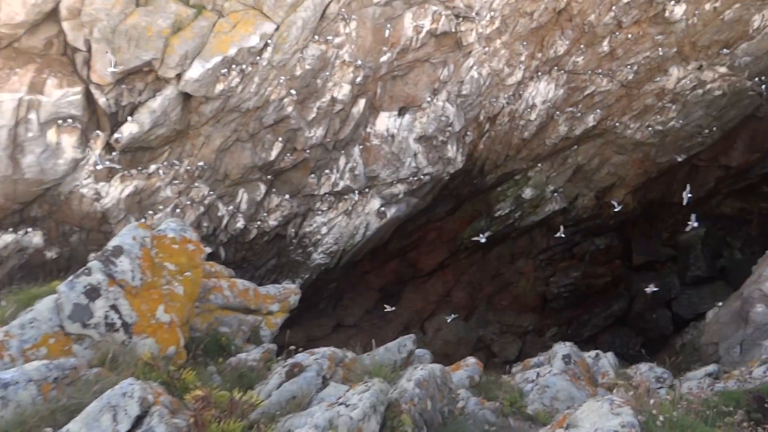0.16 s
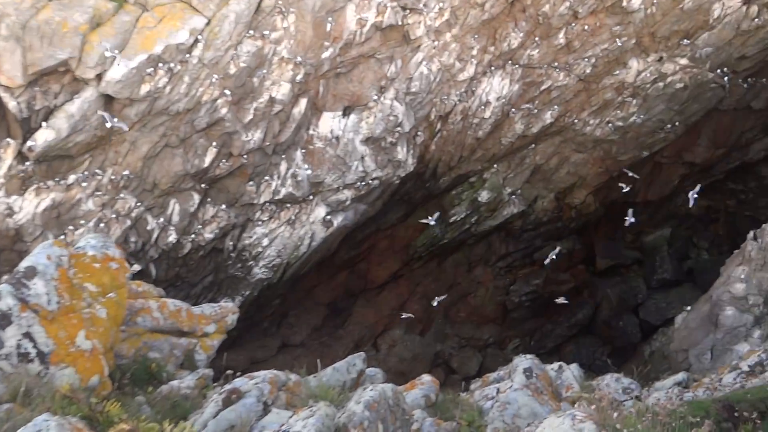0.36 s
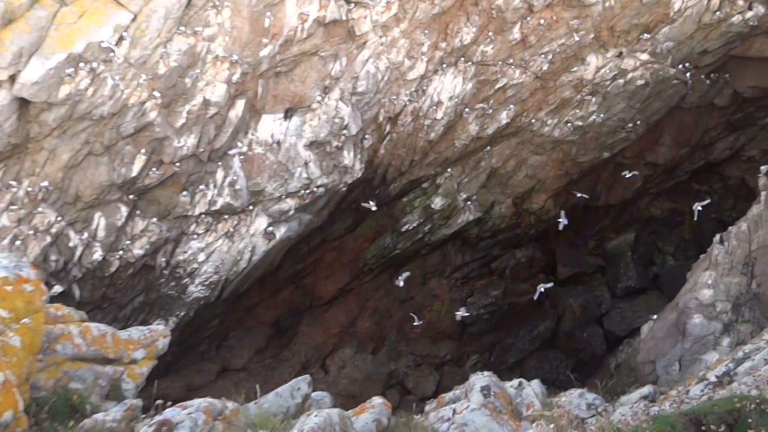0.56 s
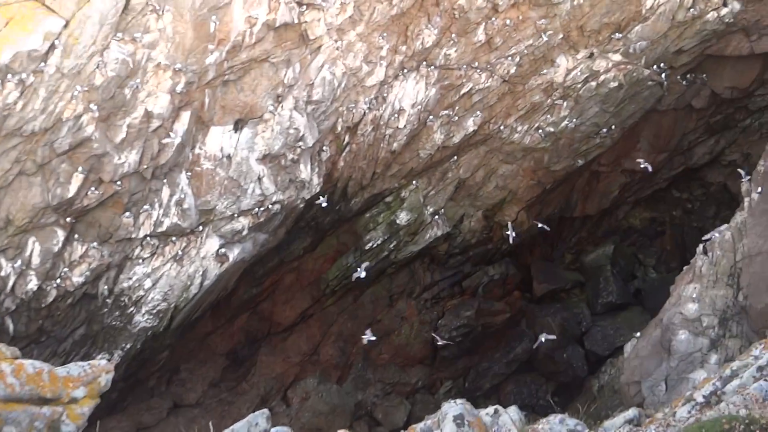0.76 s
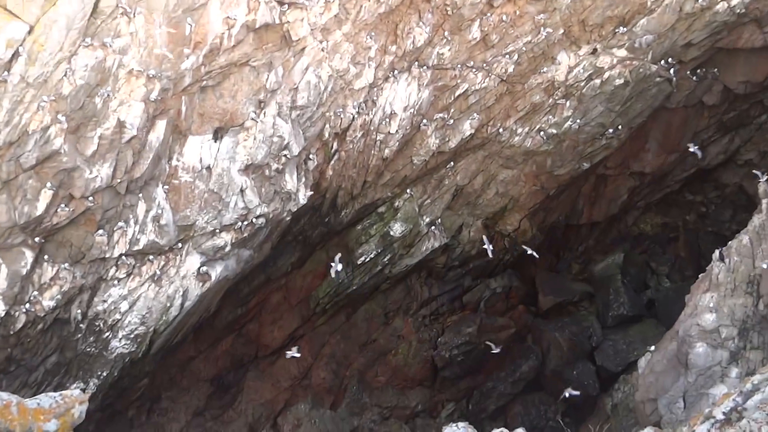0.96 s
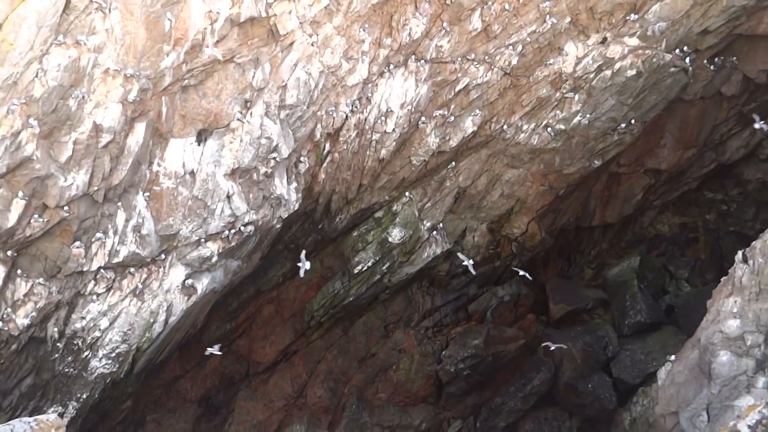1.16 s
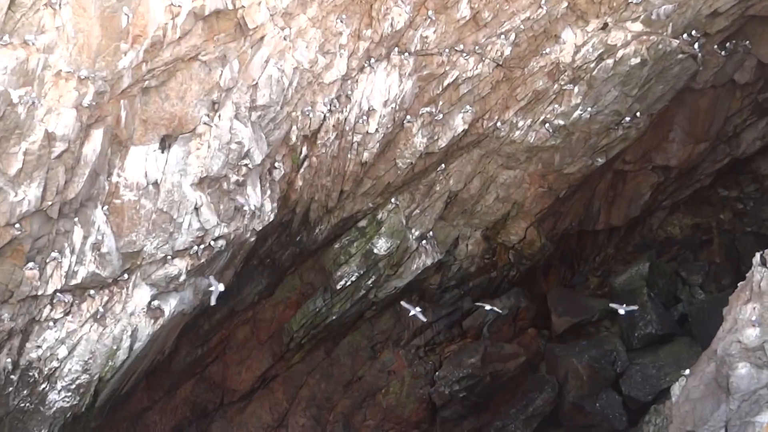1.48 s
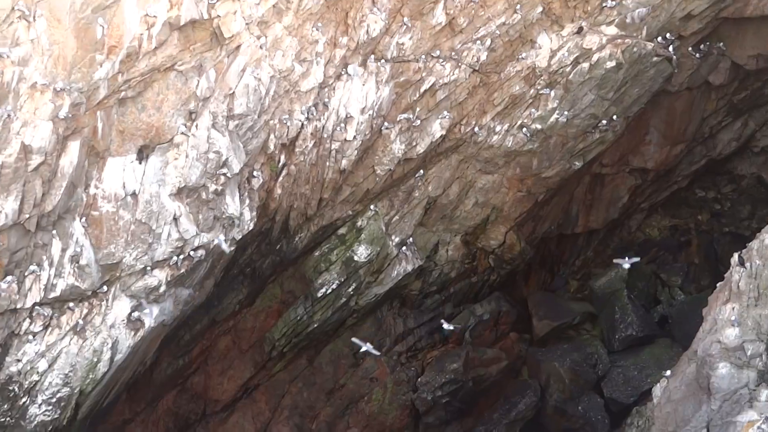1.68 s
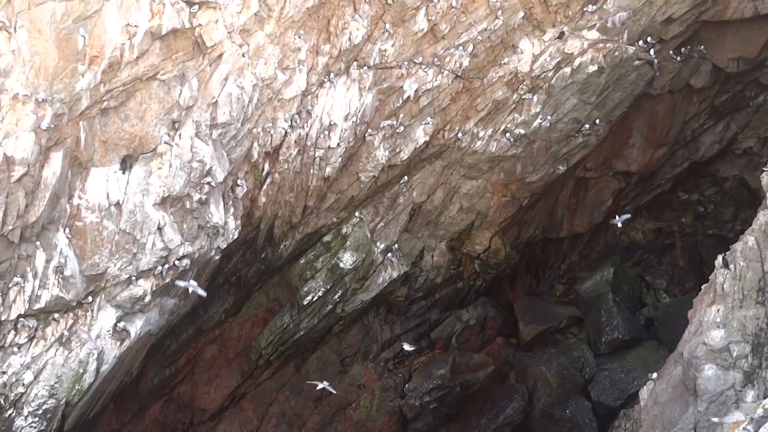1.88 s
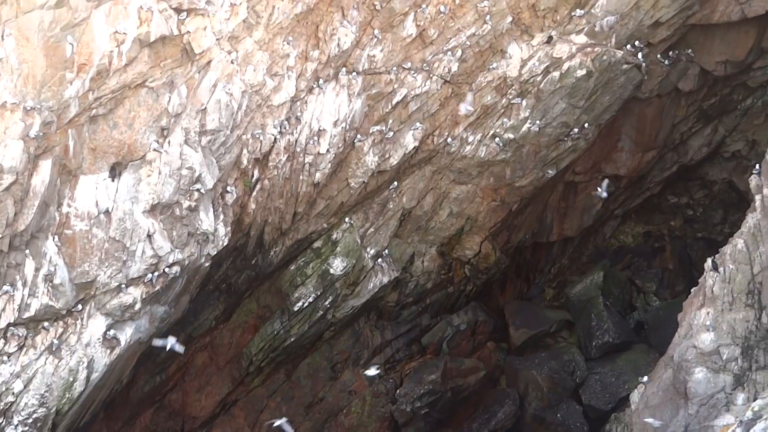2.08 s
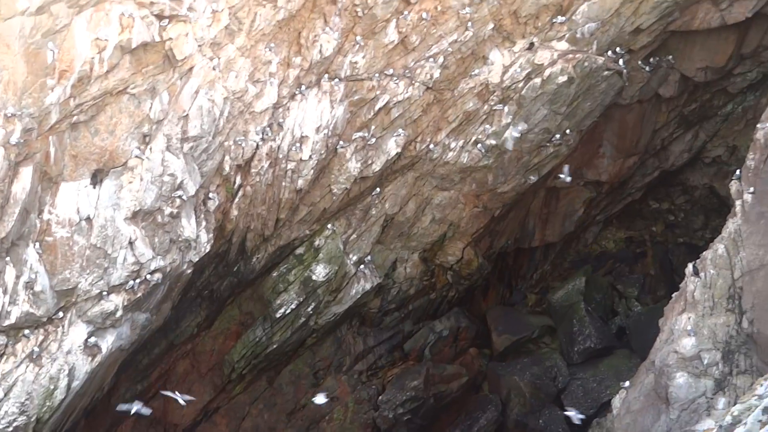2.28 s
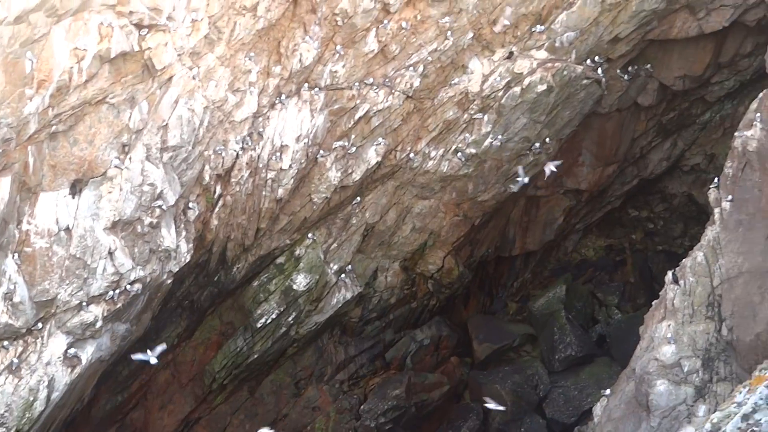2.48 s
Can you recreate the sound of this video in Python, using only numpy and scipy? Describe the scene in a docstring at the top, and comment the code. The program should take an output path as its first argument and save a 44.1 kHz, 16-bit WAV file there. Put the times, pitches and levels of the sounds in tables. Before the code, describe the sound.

Overlapping seabird cries, loud and close at first, thin slightly mid-way then surge again near the end, with brief throaty growls, rock echo, an even wash of surf and very faint wind thumps.

```python
"""A colony of gulls on a sea cliff: birds close by wail and squeal, each call a stack of harmonics.
Behind them a far crowd of callers blurs, made of many short calls, their echo off the rock and shaped noise.
Surf, a steady wash of noise, lies below; now and then a near bird growls, in slow pulses ringing a throat.
Later two soft thumps of wind, low sine puffs, touch the microphone."""
import sys
import numpy as np
from scipy import signal
from scipy.io import wavfile
from scipy.ndimage import uniform_filter1d

SR = 44100
rng = np.random.default_rng(int(sys.argv[2]) if len(sys.argv) > 2 else 0)


def wav_record(signal):
    """Record a signal, one row per channel, as 16-bit PCM in the file named by sys.argv[1]."""
    frames = np.transpose(np.atleast_2d(signal))
    bounded = np.clip(frames, -1, 1)
    # unit amplitude maps onto the largest positive 16-bit level
    quanta = np.round(bounded * 32767).astype(np.int16)
    wavfile.write(sys.argv[1], SR, quanta)


N = 115983
ATTACK_S, RELEASE_S = 0.0045, 0.007  # onset and fade settings of every call and growl


def gain_of(db):
    """Amplitude factor of a level in dB."""
    return 10 ** (np.asarray(db) / 20)


def evened(x):
    """Scales a signal to rms 1."""
    return x / np.sqrt(np.mean(x ** 2) + 1e-20)


def read(points, hz):
    """Reads a curve of (f/Hz, value) points, interpolated along log frequency."""
    f, value = np.transpose(points)
    return np.interp(np.log(hz + 1), np.log(f + 1), value)


def add(mix, start_s, sound, pan_db):
    """Places a sound in the stereo mix by a left-right level difference."""
    part = mix[:, max(round(start_s * SR), 0):][:, :len(sound)]
    sides = gain_of([[pan_db / 2], [-pan_db / 2]])
    part += sides * sound[:part.shape[1]]


def drift(count, size):
    """Smooth random wandering of rms 1: noise averaged twice over size steps."""
    once = uniform_filter1d(rng.standard_normal(count), size)
    return evened(uniform_filter1d(once, size))


def swell(t, length):
    """Loudness outline of a call: attack, hold, release, with rounded slopes."""
    rise = t / ATTACK_S
    fall = (length + RELEASE_S - t) / (2 * RELEASE_S)
    return np.sin(np.pi / 2 * np.clip(np.minimum(rise, fall), 0, 1)) ** 2


def shaped(x, field_db):
    """Weights the short-time spectrum by a level rule of frequency and time."""
    hz, t, z = signal.stft(x, SR, nperseg=512)
    weighted = z * gain_of(field_db(hz[:, None], t))
    return signal.istft(weighted, SR, nperseg=512)[1][:, :x.shape[1]]


def voice(length, pitch_hz, effort_db, harmonics_db, rasp_db):
    """One call: a stack of harmonics on a slightly unsteady pitch, each fringed with rasp."""
    wobble, shimmer_db = 0.0022, 0.65  # rms unsteadiness of pitch (fraction) and of level
    throat_hold = 0.9  # 0: each harmonic keeps its level as pitch glides; 1: a fixed throat colours them
    rasp_full_hz = 4000  # harmonics below this are less hoarse
    t = np.arange(0, length + RELEASE_S, 1 / SR)
    n = len(t)
    steps = np.linspace(0, length, len(pitch_hz))

    glide = uniform_filter1d(np.interp(t, steps, pitch_hz), size=400, mode="nearest")
    hz = glide * (1 + wobble * drift(n, size=250))
    turn = 2 * np.pi * np.cumsum(hz) / SR

    k = np.arange(1, len(harmonics_db) + 1)[:, None]  # harmonic numbers
    throat_place = k * (hz / np.median(hz)) ** throat_hold
    colour = gain_of(np.interp(throat_place, k[:, 0], harmonics_db))
    rasp_depth = gain_of(rasp_db) * np.minimum(k * hz / rasp_full_hz, 1) ** .5
    rasp = 1 + rasp_depth * [drift(n, size=40) for _ in k]
    audible = k * hz < SR / 2
    stack = (colour * rasp * np.cos(k * turn + k ** 2) * audible).sum(axis=0)

    flutter = gain_of(shimmer_db * drift(n, size=300))
    effort = gain_of(np.interp(t, steps, effort_db))
    return np.sqrt(2) * stack * flutter * effort * swell(t, length)


def near_calls():
    """Birds close by: each call glides through four even steps of pitch and effort."""
    # near calls: t/s, length/s, left-right/dB, four of pitch f/Hz, four of effort level/dB
    calls = [(0, 0.062, -0.6, 1017, 1010, 1038, 1027, -37, -43.5, -40, -43),
             (0.029, 0.086, 3.5, 1213, 1234, 1276, 1300, -34, -50, -40, -54),
             (0.05, 0.038, -1.6, 1108, 1162, 1165, 1233, -25.5, -30.5, -27.5, -25.5),
             (0.093, 0.029, 0.9, 570, 615, 649, 648, -27, -26.5, -26, -25),
             (0.14, 0.064, 1.5, 597, 626, 612, 589, -32, -39.5, -37, -22),
             (0.14, 0.13, -2, 1213, 1200, 1173, 1246, -45, -28.5, -28, -31),
             (0.201, 0.087, 1, 576, 661, 691, 708, -26.5, -19.5, -20, -17),
             (0.279, 0.053, 6.5, 1240, 1242, 1247, 1228, -28, -28, -32.5, -30),
             (0.287, 0.031, -0.5, 799, 784, 777, 797, -21, -23.5, -20.5, -27),
             (0.33, 0.072, 0.4, 611, 609.5, 643, 602, -28, -29.5, -26, -27),
             (0.356, 0.056, -1, 686, 649, 670, 647, -35, -28.5, -35, -42),
             (0.397, 0.06, 1.5, 883, 907, 899.4, 887, -23, -23.5, -21.5, -24.5),
             (0.401, 0.15, 1.4, 594, 579, 587, 605, -28, -34.5, -29.5, -29),
             (0.398, 0.17, 1, 1810, 1792, 1770, 1709, -21.5, -21.5, -21, -24.5),
             (0.53, 0.13, 1.5, 605.7, 611, 641.5, 615, -26.5, -28, -24.5, -32),
             (0.572, 0.076, 1, 1766, 1790, 1807, 1756, -53, -33, -33.5, -39),
             (0.659, 0.077, 3, 1750, 1750, 1725, 1660, -31, -30.5, -33.5, -26.5),
             (0.76, 0.14, 1.5, 1757, 1762, 1747, 1756, -45, -30, -39, -48),
             (0.925, 0.039, 3, 553, 575, 586, 586, -36, -36, -40, -40),
             (0.953, 0.033, 3, 407, 430, 462, 493, -43, -36, -40, -37),
             (0.961, 0.12, 4.5, 635, 640, 642, 647, -46, -43, -38.5, -43),
             (1.052, 0.061, 4, 689, 679, 703, 688, -33, -37.5, -34, -34),
             (1.078, 0.078, 2.5, 558.4, 594, 631, 631, -32, -36, -32.5, -34),
             (1.105, 0.045, -4, 975, 1000, 1005, 980, -45, -40, -41, -43),
             (1.152, 0.055, 4, 538, 565, 596, 618, -39, -33.5, -39, -33),
             (1.165, 0.16, 2.5, 1299, 1245, 1235, 1257, -35, -32.5, -33.5, -27.5),
             (1.207, 0.13, 3, 616, 628, 618, 627, -36, -30.5, -31, -31),
             (1.231, 0.077, -1, 564, 572, 592, 593, -37, -38, -37, -34),
             (1.317, 0.082, 1.0, 1728, 1774, 1770, 1760, -36, -28, -28.5, -32),
             (1.331, 0.15, 2.5, 633, 625, 650.6, 650, -36, -37, -37, -40),
             (1.418, 0.091, 3.5, 558, 557, 559, 526, -34, -34, -30.5, -30),
             (1.486, 0.15, 2.5, 1756, 1784, 1816, 1755, -32, -37, -37.5, -37),
             (1.551, 0.11, 4, 1819, 1836, 1796, 1767, -45, -37.5, -33.5, -34),
             (1.682, 0.12, 3, 1874, 1781, 1810, 1821, -31, -35.5, -36, -38),
             (1.706, 0.05, 5, 1410, 1484, 1606, 1720, -46, -29, -38, -51),
             (1.737, 0.044, 3, 578, 588, 600, 620, -29, -33, -53, -42),
             (1.923, 0.053, 2.5, 638, 648, 660, 728, -39, -31, -32.5, -31),
             (1.967, 0.073, 7, 1174, 1150, 1097, 1120, -47, -42, -46, -41),
             (1.981, 0.066, 3.5, 644, 631, 629, 653, -40, -40, -38, -35),
             (2.03, 0.1, 3, 553, 545, 527, 523, -32.5, -36, -35, -48),
             (2.044, 0.048, 2.9, 993, 990, 985, 960, -31, -28.5, -27, -26),
             (2.089, 0.18, 7, 610, 590.5, 585.3, 587, -35, -34, -36, -40),
             (2.095, 0.044, 0.5, 680, 687, 685, 660, -21.5, -25.5, -27, -21),
             (2.14, 0.066, 0, 656, 655, 643, 661, -29, -24, -33, -29),
             (2.162, 0.11, 1, 651, 635, 633, 629, -38, -23, -28.5, -37),
             (2.242, 0.13, 6, 582.4, 580, 572, 560, -43, -37, -37, -38),
             (2.249, 0.081, 1.3, 626, 620.4, 617, 610, -30, -39, -33.5, -35),
             (2.314, 0.062, 0.5, 803, 790, 805, 790, -34.5, -29.5, -30, -27.5),
             (2.372, 0.12, 2, 772, 688, 714.5, 725.6, -35.5, -27, -28, -29),
             (2.5, 0.062, 2.5, 826, 814, 797, 780, -31.5, -31, -38, -29),
             (2.5, 0.11, 5, 522, 535, 533.5, 537, -35, -38, -44, -34),
             (2.592, 0.037, 4, 561, 620, 632, 666, -31, -27, -28, -22.5)]
    # throat colour, one row a call: level/dB of harmonics 1, 2, 3 ..
    harmonics = [(-9, 3.5, -2, -28, -28, -16, -33, -33, -32.5, -45, -44, -45),
                 (-7, 2, 2.5, -12, -24, -32, -31.5, -45, -36, -45),
                 (-11.5, -0.5, -28.5, -17, -25, -34, -36.5, -42, -45, -45, -45),
                 (-30, -13, -9.5, 2, -26, -19, -22, -22, -19, -19),
                 (-27, -6.5, -27, -13, -7, -21, -11, -32, -7, -15, -21, -13),
                 (-9.5, -4, -29.5, -21, -12, -30, -18, -38, -38, -31),
                 (-19.5, -14.5, -9.5, -16, -17.5, -21, -21, -4, -2.5, -23.5, -19, -20.5),
                 (-34, -23, 3.5, -22, -11, -27, -30.5, -45, -25, -29),
                 (-19, -15, -6.5, -9.5, -19, -8, -6, -6, -11, -39, -23, -23),
                 (-27, -13, -2, -16, -11, -16, -14, -12, -6, -10, -21, -31),
                 (-12, -8, -3, -6, -26, -15, -21, -21, -14, -15, -31, -25.5),
                 (-19, -29, -23, -26, -10, -8, -7.5, -21.5, -15.5, -32, -48, -49),
                 (-12, -5, -19, -9, -23, -26, -28, -8, -26, -26, -16, -23),
                 (-2.5, -22, -26, -25, -19, -40, -42),
                 (-15, -4, -20, -5, -19, -9, -40, -19.5, -28, -20, -17, -31),
                 (0, -27, -10, -24, -15, -45, -45), (-5.5, 2.5, -12.5, -9.5, -20, -48, -31),
                 (-22, -2, -12, -10.5, -27, -45, -49),
                 (-26, -15, -8, -4.5, -12, -3, -27, -17, -10, -6.5, -9, -27),
                 (-25, -11, -21, -14, -3, 2, -16, -20, -25, -10, -10, -20),
                 (-24, -8, -24, -5, -26, -1.5, -14, -3.5, -8, -31, -28, -35),
                 (-25, -11, -12, -1, -14, -16, -10, -17),
                 (-29, -15, -14, 1, -15, -27.5, -19, -4.5, -22, -16, -18, -31),
                 (-23, -15, -19, -22, -21, -1, -4, -24),
                 (-12, -7, -26, -12, -7, -13, -5, -11, -18, -4, -23, -18),
                 (-4, -15, -12, -13, -17, -31, -42, -47, -43, -47),
                 (-15, -17, -19, -12, -10, -17, -13, -4.5, -17, -10, -14, -35.5),
                 (-19, -7, -16, -5, -16, -16, -18, -15, -18, -4), (-3, -15.5, -17, -16, -41, -32, -43.5),
                 (-11.5, -7, -8, -0.5, -3.5, -14, -9, -8, -5, -10, -17, -33),
                 (-24, -35, -3, -27, -28, -10, -8, -10, -19, -13, -12, -21),
                 (-3.5, -4, -6.5, -13, -28, -38, -39), (-5, 0.5, -8, -18, -23, -23, -32),
                 (-5, -6, -11, -16, -19, -27.5, -36), (-15, -3.5, -20, -29, -26, -22, -41, -42),
                 (-6, -15, -5, -28, -25.5, -4, -20, -30, -2, -28, -30, -31),
                 (-13, -8.5, -12, -1, -6, -13, -25, -15, -4.5, -39, -29, -23.5),
                 (-18, -7, -14, 0, -20, -18, -28, -32, -37, -42, -42),
                 (-15, -6, -19, -0.5, -2, -10, -5, -17, -8, -21.5, -23, -31),
                 (-6, -2, -10, -21, -9, -9, -5, -24, -9, -13, -16, -18),
                 (-13, -1.5, -9.5, -14, -14, -10, -18, -19, -24, -40, -39, -45),
                 (-16, -6, -8, -8, -3.5, -5, -10, -6, -21, -11.5, -21.5, -26),
                 (-18.5, -9.5, -8, -6.5, -19, -17, -16, -11, -13, -13.5, -17, -20.5),
                 (-17, -20.5, -13, -6, -15, -16, -21.5, -5.5, -9.5, -14, -14, -19),
                 (-14, -13, -9.5, -10, -10, -20, -19, -25, -13, -14, -20, -29),
                 (-11, -7, -7.5, -22, -21, -22, -5, -7, -17, -7, -16, -27),
                 (-9.5, -9, -7, -14, -5, -22, -21, -26, -25, -22, -26, -27),
                 (-7.5, -11, 0, -4.5, -24, -32.5, -8, -14.5, -26, -20, -20, -30.5),
                 (-9, -10, -2, -1.5, -17, -22, -22, -9.5, -10, -17, -18, -22),
                 (-6.5, -26, -17, -2.5, -24, -7.5, -8, -27, -29, -13.5, -23, -32),
                 (-16, -0.5, -23, -5, -21, -4, -15, -2.5, -21, -29, -24, -28),
                 (-12, -26, -9.5, -5, -8.5, -10, -21, -9, -3, -35, -8.5, -12.5)]
    # hoarseness, one value a call: fast random flutter depth/dB
    hoarseness = [-3, -12, -18, -3, -11, -3, -10.5, -10, -8, -6, -6, -10, -19, -24, -18, -20, -18, -10.5,
                  -14, -14, -20, -6, -17, -20, -17, -19, -20, -14, -19, -4, -7, -9, -8, -10, -18, -12, -10,
                  -14, -10, -5, -5, -6, -12, -9, -16, -12, -10, -22, -31, -1, -7, -10]
    near = np.zeros((2, N))
    for (start, length, pan_db, *shape), colour, rasp_db in zip(calls, harmonics, hoarseness):
        add(near, start, voice(length, shape[:4], shape[4:], colour, rasp_db), pan_db)
    return near


def cliff(x):
    """Echo of the rock: sparse taps of random sign, each band dying at its own speed, mostly shared by both sides."""
    # how long the rock rings: f/Hz, fall by 60 dB t/s
    decay_times = [(500, 0.6), (2000, 0.8), (6000, 0.34), (12000, 0.3)]
    echo_wide = 0.28  # share that differs between the sides
    taps = np.zeros((2, SR))
    # one tap at random in every 20 samples, after a short gap
    at = np.arange(500, SR - 20, 20) + rng.integers(0, 20, (2, (SR - 501) // 20))
    np.put_along_axis(taps, at, rng.choice([-1., 1.], at.shape), 1)

    hz, t, z = signal.stft(taps, SR, nperseg=256)
    decay = gain_of(-60 * t / read(decay_times, hz)[:, None])
    middle, side = signal.istft(z * decay, SR, nperseg=256)[1]
    tail = np.array([middle + echo_wide * side, middle - echo_wide * side])
    return signal.fftconvolve(x, tail / np.linalg.norm(tail[0]), axes=1)[:, :N]


def wash(colour, patch_db, swell_db):
    """Stereo noise of rms 1 from random short-time spectra with drifting patches and a gentle swell."""
    # left-right likeness: f/Hz, likeness/1
    likeness = [(25, .97), (60, 0.93), (180, 1), (550, .95), (1650, 0.89), (4970, 0.72), (9000, 0.9),
                (11500, 0.95), (15000, 1)]
    # lean to the left: f/Hz, left-right level/dB
    side_lean = [(25, -.6), (60, -.2), (180, 0), (550, 1.5), (1650, 1.5), (4970, 2.5), (11500, -0.5),
                 (15000, 0)]
    frames, hz = N // 256 + 5, np.fft.rfftfreq(1024, 1 / SR)
    a, b, c, d, patches = rng.standard_normal((frames, 513, 5)).T
    patches = uniform_filter1d(patches, size=10, axis=0)  # across frequency
    patches = evened(uniform_filter1d(patches, size=12, axis=1))  # across time

    same = np.clip(read(likeness, hz), -1, 1)[:, None]
    left = a + 1j * b
    right = same * left + np.sqrt(1 - same ** 2) * (c + 1j * d)
    z = np.array([left, right])

    z *= gain_of(read(colour, hz)[:, None] + patch_db * patches + swell_db * drift(frames, size=20))
    lean = read(side_lean, hz) / 2
    z *= gain_of([lean, -lean])[:, :, None]
    return evened(signal.istft(z, nperseg=1024, noverlap=768)[1][:, :N])


def crowd():
    """Far birds at random pitch and place, a weaker echo trailing them, over the blur of those too far to tell apart."""
    # rise and fall of the crowd: t/s, level/dB, brightness/(dB per octave above 2 kHz)
    course = [(0.0, -28, -1), (0.12, -30.5, -0.5), (0.37, -26.5, 1), (0.59, -29, 0), (0.738, -32, -0.5),
              (1.05, -36.5, 1), (1.3, -27, -1.5), (1.45, -29, -0.5), (1.59, -30, 1), (1.74, -34, 0.5),
              (1.98, -32, 0), (2.23, -26.5, 1.5), (2.63, -27.5, -0.5)]
    # colour of distant birds: f/Hz, level/dB (density per Hz in the blur)
    distant_colour = [(290, -54), (500, -4), (1230, -1.5), (2050, -2), (2500, 0), (3670, -4.5),
                      (4050, -4.5), (6210, -6.5), (8860, -12.5), (13200, -37.5), (15000, -39)]
    calls, length_s, glide = 80, 0.12, 0.07  # glide: fraction of pitch
    low_hz, high_hz = 558.3, 950
    lines_db, fundamental_db, rasp_db = 4, -9.5, -18  # lines: random spread of harmonic levels
    voices_db, blur_db, far_dry_db = -5, -7.5, 5.5  # far_dry: unechoed calls before the echo is added

    far, k = np.zeros((2, N)), np.arange(1, 15)
    for bird, (at, high, bend, end, long, side) in enumerate(rng.random((calls, 6))):
        hz = low_hz * (high_hz / low_hz) ** (high ** 1.4)  # low pitches are commoner
        colour = read(distant_colour, k * hz) + lines_db * rng.standard_normal(len(k))
        colour += fundamental_db * (k == 1)
        pitch = hz * (1 + glide * np.array([-2 * bend, 0, end - .5]))
        start = (bird + at) / calls * N / SR
        call = voice(length_s * (.5 + long), pitch, [-3, 0, -2], colour, rasp_db)
        add(far, start, call, 1.0 + 6 * (side - .5))

    voices = evened(gain_of(far_dry_db) * far + cliff(far))
    blur = gain_of(blur_db) * wash(distant_colour, patch_db=3.5, swell_db=0.5)
    s, db, bright = np.transpose(course)

    def course_db(hz, t):
        """Level of the crowd at each moment, tilted above 2 kHz."""
        octaves = np.log2(np.maximum(hz / 2000, 1))
        return np.interp(t, s, db) + np.interp(t, s, bright) * octaves

    return shaped(gain_of(voices_db) * voices + blur, course_db)


def surf():
    """Surf below the cliff: many splashes merge into a steady noise with little swell."""
    # colour of the surf: f/Hz, level/dB (density per Hz)
    surf_colour = [(15, -70), (25, -46), (112, -10.5), (515, 3), (1240, 3), (2020, -3), (2500, 0),
                   (4040, -20), (7090, -22.5), (13100, -29), (15000, -39)]
    return gain_of(-35.5) * wash(surf_colour, patch_db=0.67, swell_db=0.16)


def growl(length, rate, from_hz, to_hz, level_db):
    """Uneven slow pulses through a gliding throat resonance, applied twice."""
    width_hz, jitter, spread_db = 540, 0.08, 2.5  # resonance width, rms unevenness of rate and pulse level
    t = np.arange(0, length + RELEASE_S, 1 / SR)
    turns = np.cumsum(rate * (1 + jitter * drift(len(t), size=200))) / SR
    pulses = np.diff(np.floor(turns), prepend=0)  # one pulse at each whole turn
    pulses = pulses * gain_of(spread_db * rng.standard_normal(len(t)))

    throat_hz = np.linspace(from_hz, to_hz, len(t))
    turn = np.exp(2j * np.pi * np.cumsum(throat_hz) / SR)
    r = np.exp(-np.pi * width_hz / SR)
    # shift the throat to 0 Hz, ring there, shift back
    rung = (turn * signal.lfilter([1], [1, -2 * r, r * r], pulses / turn)).real
    return gain_of(level_db) * evened(rung) * swell(t, length)


def growls():
    """Near birds growling: separate pulses of the voice, each ringing the throat."""
    # growls: t/s, length/s, rate/(pulses per s), throat f/Hz at start, at end, level/dB, left-right/dB
    growl_list = [(.131, 0.045, 155, 2300, 2650, -30, 0), (.184, 0.061, 140, 2520, 2500, -30, 3),
                  (1.15, .105, 142, 2760, 2640, -36.5, 4.5), (1.348, 0.079, 182, 2650, 2330, -32, 3),
                  (2.042, 0.16, 80, 1170, 1260, -39, 0), (2.122, 0.13, 106, 2640, 2620, -35, 1),
                  (2.495, .05, 150, 3130, 3170, -52, 2)]
    near = np.zeros((2, N))
    for start, *shape, pan_db in growl_list:
        add(near, start, growl(*shape), pan_db)
    return near


def thumps():
    """Soft thumps of wind on the microphone: brief low sine puffs under a bell-shaped outline."""
    # wind thumps: t/s, level/dB
    puffs = [(1.43, -50), (1.93, -59)]
    puff_hz, puff_s = 75.6, 0.041  # puff_s: from the peak to 1/e
    t = np.arange(N) / SR
    tone = np.sin(2 * np.pi * puff_hz * t)
    return sum(gain_of(db) * np.exp(-((t - s) / puff_s) ** 2) * tone for s, db in puffs)


def scene():
    """Near birds and their echo off the rock, the far crowd, the surf and the wind thumps."""
    near = near_calls() + growls()
    echo = gain_of(-14) * cliff(near)
    return near + echo + crowd() + surf() + thumps()


def record(dry):
    """Overall tone colour (bass cut, lift near 14 kHz, steep drop above), then a steep low-pass."""
    # overall tone colour: f/Hz, level/dB
    tone_colour = [(20, -30), (120, -7.5), (200, -0.5), (9000, -0.5), (13000, 2), (14300, 4), (14900, -12),
                   (16000, -16)]
    edge_hz, margin = 15400, SR // 10  # mirrored margins keep the ends whole
    padded = np.pad(dry, ((0, 0), (margin, margin)), "reflect")
    coloured = shaped(padded, lambda hz, t: read(tone_colour, hz))
    lowpass = signal.firwin(511, edge_hz, window=("kaiser", 9), fs=SR)
    return signal.oaconvolve(coloured, lowpass[None], "same")[:, margin:][:, :N]


dry = scene()
out = record(dry)
wav_record(out)
```